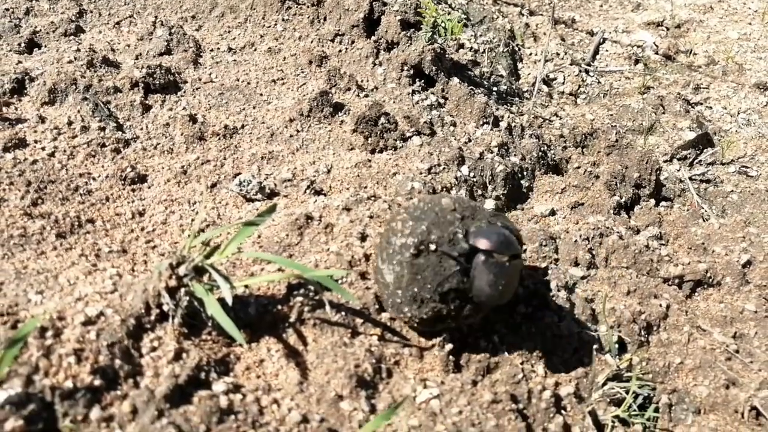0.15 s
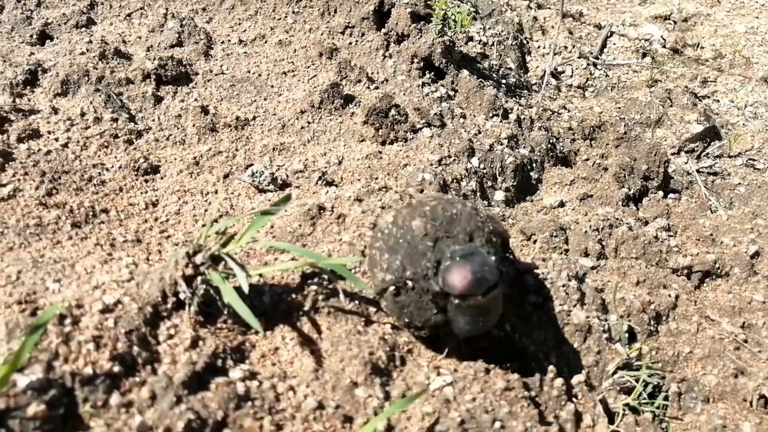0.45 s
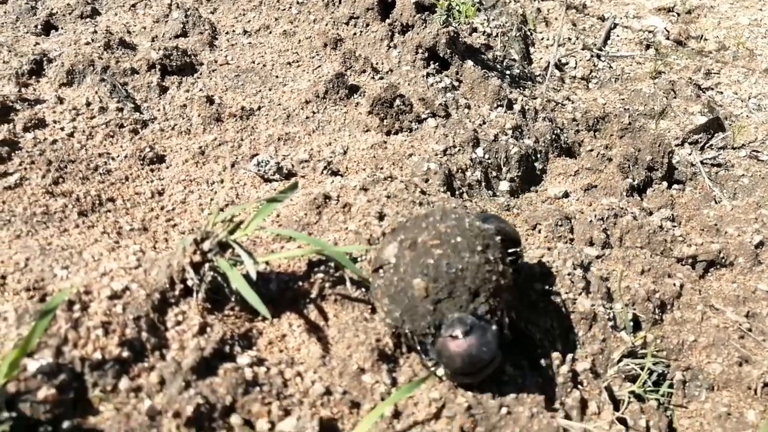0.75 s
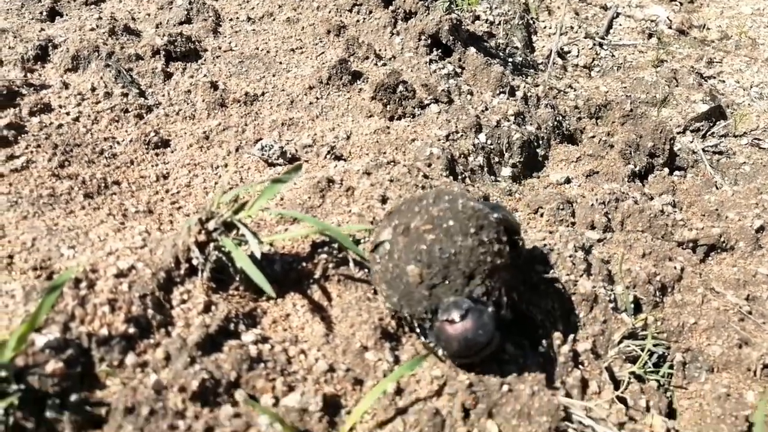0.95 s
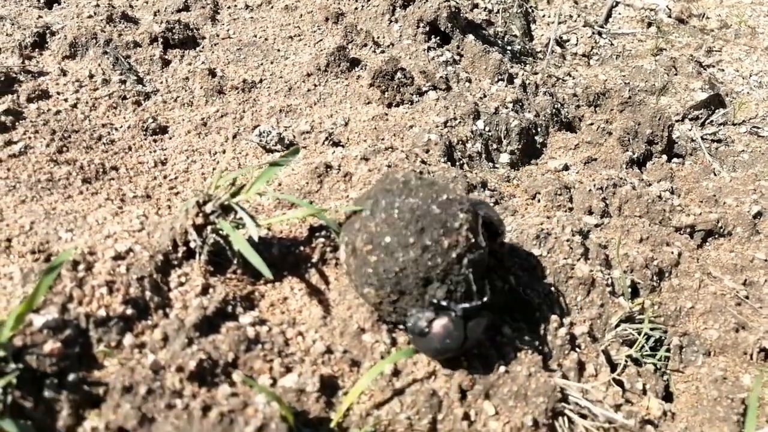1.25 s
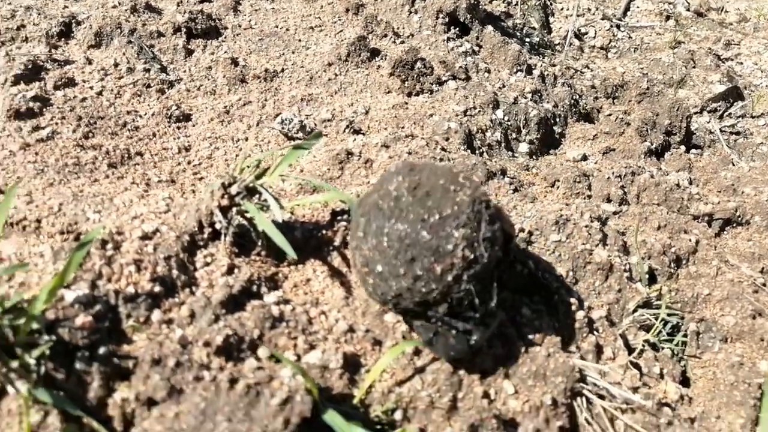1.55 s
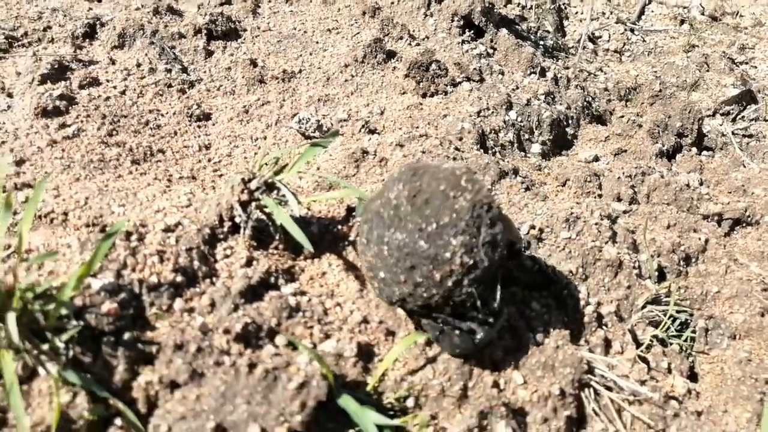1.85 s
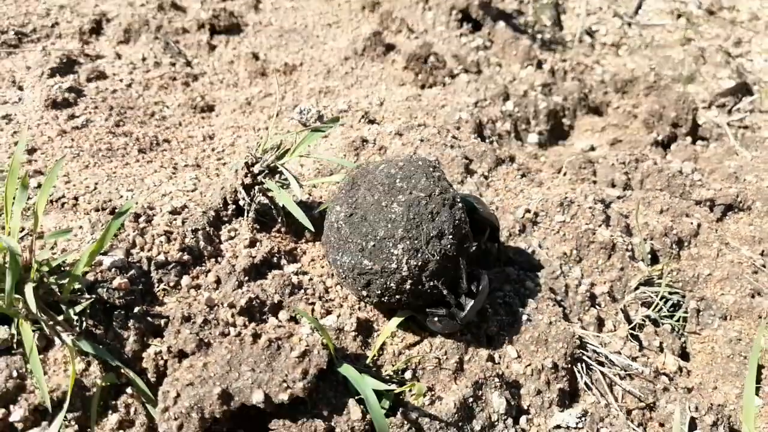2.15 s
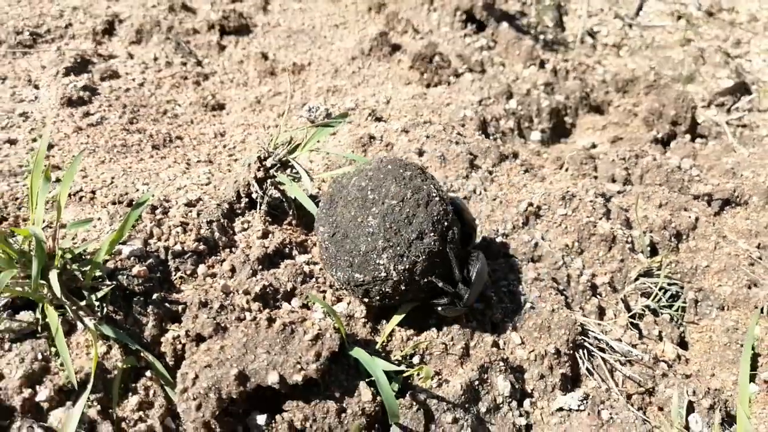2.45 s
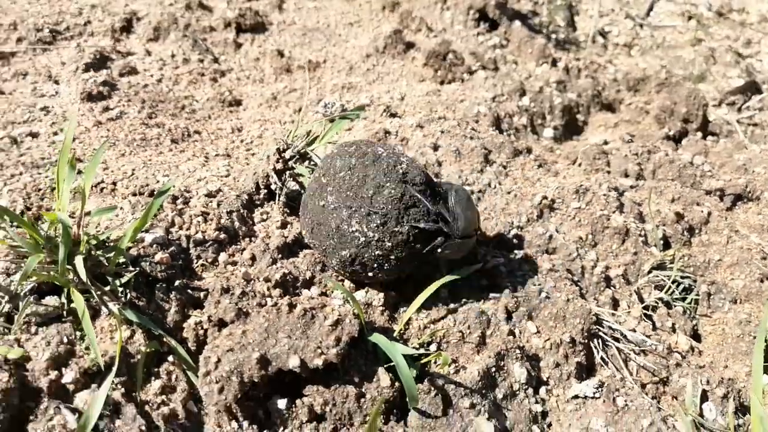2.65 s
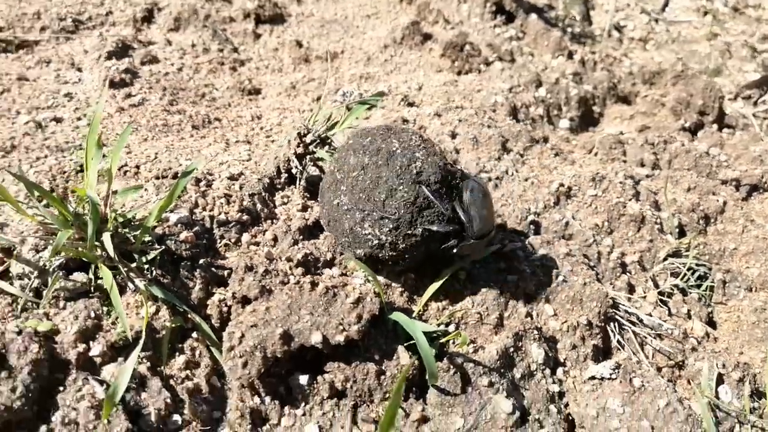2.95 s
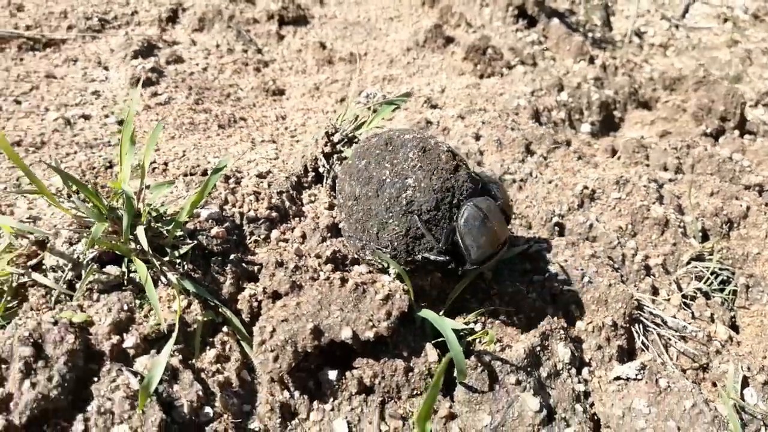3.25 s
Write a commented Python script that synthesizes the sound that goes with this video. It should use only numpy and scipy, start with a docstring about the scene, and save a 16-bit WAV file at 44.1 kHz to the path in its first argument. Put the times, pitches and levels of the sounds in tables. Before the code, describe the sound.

Low, uneven wind rumble on a close microphone outdoors, over faint hiss. Small ticks and rustles of dry soil and faint insect chirps come and go, and halfway through a single short knock hits near the microphone.

```python
"""A light breeze rumbles on the two microphone ports of a phone held low over dry soil.
Each port catches its own turbulence, with flutter, a faint whistle and sharp puffs, over a faint hiss.
To the right an insect rasps its wings in short trains of chirps. Grit and dry stalks rustle in showers
of grains and tick with hollow pings. One soft knock by the right port rings the case."""
import sys
import numpy as np
from scipy import signal
from scipy.fft import rfft, irfft
from scipy.io import wavfile
from scipy.ndimage import uniform_filter1d

SR = 44100
rng = np.random.default_rng(int(sys.argv[2]) if len(sys.argv) > 2 else 0)


def put_to_file(sound):
    """Save the sound as 16-bit audio at rate SR, in the file named by the first command-line argument."""
    columns = np.atleast_2d(sound).T  # one column per channel
    safe = np.clip(columns, -1, 1)
    whole_steps = np.round(safe * 32767)
    wavfile.write(sys.argv[1], SR, whole_steps.astype(np.int16))


N = 149499
T = np.arange(N) / SR
PORT_LAG = 4  # samples by which the grit reaches the right port later
# Midrange resonances of rustles and ticks: f/Hz, width/Hz, level/dB
GRIT_MIDS = [(3630, 1090, -4.5), (5110, 1450, 3)]


def amp(db):
    return 10 ** (np.asarray(db, float) / 20)


def unit(x):
    return x / np.sqrt(np.mean(x ** 2))


def pan(db):
    """Left and right gains; positive dB leans left."""
    return amp(np.array([db, -db]) / 2)


def coloured(spectrum, low_hz, high_hz):
    """Two unrelated noises with the given spectrum, rolled off at both edges."""
    f = np.maximum(np.fft.rfftfreq(N, 1 / SR), 1)
    hz, db = np.array(spectrum, float).T
    edges = np.sqrt((1 + (low_hz / f) ** 8) * (1 + (f / high_hz) ** 8))
    gain = amp(np.interp(np.log(f), np.log(hz), db)) / edges
    return unit(irfft(rfft(rng.standard_normal((2, N))) * gain, N))


def wander(rate_hz):
    """Smooth random drift for each channel, at unit RMS."""
    hold = max(int(SR / rate_hz), 2)
    steps = np.repeat(rng.standard_normal((2, N // hold + 1)), hold, axis=1)
    return unit(uniform_filter1d(uniform_filter1d(steps, hold), hold)[:, :N])


def resonate(x, bands):
    """Parallel band-passes of alternating polarity, scaled so that white noise keeps its level."""
    def bank(drive):
        out = 0
        for k, (hz, width, db) in enumerate(bands):
            sos = signal.butter(2, [hz - width / 2, hz + width / 2], "band", fs=SR, output="sos")
            out += (-1) ** k * amp(db) * signal.sosfilt(sos, drive)
        return out
    return bank(x) / np.linalg.norm(bank(signal.unit_impulse(4096)))


def wind():
    """Turbulence at each port: a rumble, a gustier flutter and a faint whistle above it."""
    # Gust contour: t/s, level/dB, flutter and whistle re rumble/dB, pan/dB
    gusts = [(0.0, -46.5, -1, -6, -9), (0.03, -45.5, -13, -45, -7.0), (0.07, -51, -6, -12, -2),
             (0.15, -45, -18.5, -15.5, -7.5), (0.26, -49.5, -4.5, -13, -1.5), (0.31, -45.5, -10, -6, -7.5),
             (0.37, -44.5, -9, -15, -0.5), (0.55, -46.5, -3, -16.5, -1.5), (0.6, -45, -19.5, -30.5, -9.5),
             (0.73, -47, -4, -13.5, 3.5), (0.88, -49, -3, -22, -3.5), (0.93, -45.5, -18.5, -25.5, -10.5),
             (0.98, -57, -4, -14, 1), (1.02, -48.5, -16.5, -24, -1.5), (1.21, -49.5, -7, -17.5, -2),
             (1.57, -53, -8.5, -19.5, -1.5), (2.1, -47, -9, -27.5, -8), (2.19, -44.5, -8, -10, 5.5),
             (2.22, -37, -12, -23.5, 2.5), (2.29, -51, -1.5, -20, -9.5), (2.33, -44.5, -5.5, -10.5, 1),
             (2.47, -48, -13, -25.5, -5), (2.58, -56, -10, -21.5, -5.5), (2.76, -52, -19, -28, -4.5),
             (3.27, -57, -10.5, -18.5, -6), (3.39, -51.5, -18, -36, -0.5)]
    # Spectrum of the rumble: f/Hz, level/dB
    rumble_curve = [(12, -35.5), (20, -7.5), (53, -1), (92, -1), (152, -8), (220, -15.5), (290, -41.5),
                    (480, -120)]
    # Spectrum that flutter and whistle are cut from: f/Hz, level/dB
    flutter_curve = [(76, -30.5), (130, 0), (205, -7), (263, -12), (371, -16), (521, -26), (700, -33),
                     (910, -62), (1540, -120)]
    t, *columns = np.array(gusts, float).T
    db, flutter_db, whistle_db, side = (np.interp(T, t, column) for column in columns)
    rumble = coloured(rumble_curve, 11, 146) * amp(1.5 * wander(12))
    flutter = amp(flutter_db + 0.08 + 2.5 * wander(25)) * coloured(flutter_curve, 146.6, 291)
    whistle = amp(whistle_db - 3.5 + 2.5 * wander(30)) * coloured(flutter_curve, 317, 640)
    return amp(db + 2.5) * pan(side) * (rumble + flutter + whistle)


def hiss(level_db=-71.5):
    """A faint bed of far air and microphone noise."""
    # Spectrum of the hiss: f/Hz, level/dB
    hiss_curve = [(260, -28), (450, 1), (507, -5.5), (570, -2), (1230, -7.5), (1410, -10.5), (1860, -10),
                  (4150, -16), (5570, -18), (8560, -24.5), (9360, -24.5), (11500, -30.5), (14400, -32),
                  (15500, -30)]
    return amp(level_db + 0.72 * wander(9.9)) * coloured(hiss_curve, 350, 16000)


def insect(length_s=0.014, rise_s=0.00062, trim_db=-8):
    """Each chirp is a short rasp through the wing resonances, off to the right."""
    # Chirp trains: t/s, level/dB
    chirps = [(0.015, -67.5), (0.0857, -65), (0.161, -66.5), (0.3052, -64), (0.376, -68), (0.4474, -71),
              (0.9901, -70.5), (1.063, -72), (1.1358, -68), (1.2072, -69), (1.283, -66.5), (1.356, -65.5),
              (1.43, -65), (1.506, -66.5), (1.5823, -66.5), (1.6561, -68), (1.7285, -69), (1.8043, -66.5),
              (1.8784, -67.5), (1.955, -68), (2.03, -65.5), (2.1041, -68), (2.1789, -68), (3.1163, -68.5),
              (3.1926, -70), (3.27, -68), (3.347, -67.5)]
    # Wing resonances: f/Hz, width/Hz, level/dB
    wing = [(5430, 690, 5), (7280, 1100, 7), (9600, 1400, 2), (11500, 1500, -12)]
    envelope = np.zeros(N)
    for start, db in chirps:
        age = T - start
        envelope += amp(db + trim_db) * np.clip(np.minimum(age / rise_s, 2 * (1 - age / length_s)), 0, 1)
    return pan(-6)[:, None] * resonate(envelope * rng.standard_normal((2, N)), wing)


def grain_shower(per_s=2500, spread_db=1.8):
    """A crackly envelope: grains land at random, each a quickly fading bump."""
    hits = (rng.random(N) < per_s / SR) * amp(spread_db * rng.exponential(size=N))
    return unit(signal.lfilter([1], [1, -.985], hits))


def port_noise(share=.65):
    """White noise, part of which reaches both ports a few samples apart."""
    common = rng.standard_normal(N)
    separate = np.sqrt(1 - share ** 2) * rng.standard_normal((2, N))
    return share * np.array([common, np.roll(common, PORT_LAG)]) + separate


def rustles(crackle, fade_s=0.0095):
    """Grit and dry stalks rustle in dense showers; stray grains fall throughout."""
    # Showers of grains: t/s, length/s, dull/dB, mid/dB, bright/dB
    showers = [(0.21, 0.088, -78.5, -78, -84.5), (0.436, 0.024, -82, -84, -87),
               (.615, 0.039, -73, -75, -77.5), (0.653, .13, -75, -76.5, -89),
               (0.883, 0.135, -88, -93, -107), (1.837, 0.027, -77, -74, -87),
               (2.234, 0.078, -80, -78.5, -85.5), (2.314, 0.046, -76, -73, -80.5),
               (2.364, 0.12, -87, -85, -103), (2.61, 0.073, -76, -84, -94),
               (2.772, 0.12, -77.5, -78.5, -84.5), (2.964, 0.087, -82.5, -81, -88),
               (3.04, 0.032, -75.5, -67, -76.5)]
    # Floor of stray grains: dull/dB, mid/dB, bright/dB
    stray_db = [-91, -91, -92]
    # Dull body of a rustle: f/Hz, width/Hz, level/dB
    dull = [(1230, 1000, 1.5), (1700, 1660, 11), (2580, 810, -1)]
    # Bright scuff on top: f/Hz, width/Hz, level/dB
    scuff = [(7340, 1440, -4), (9500, 1740, 0), (12900, 3000, -18)]
    envelopes = np.outer(amp(stray_db), np.ones(N))
    for start, length, *band_db in showers:
        gate = np.clip(np.minimum(T - start, start + length - T) / fade_s, 0, 1)
        envelopes += np.outer(amp(band_db), gate)
    return sum(resonate(env * crackle, bands) for env, bands in zip(envelopes, [dull, GRIT_MIDS, scuff]))


def ticks(noise, rise_s=.0008, ping_t60_s=0.0085, crack_t60_s=.006):
    """Each tick of grit is a hollow ping with a tiny crack of noise."""
    # Grit impacts: t/s, level/dB, ping f/Hz, mid offset/dB, bright offset/dB, pan/dB
    impacts = [(0.2349, -45.5, 1650, -23, -2.5, -5.0), (0.2566, -55, 1650, -5, -8, 2),
               (0.264, -42.5, 1690, -13, -3.5, 1.0), (0.339, -71, 1580, -7, 0, 2.0),
               (0.4472, -54.5, 1490, -12, -19, 4), (0.467, -56, 2200, -9, -17, 5),
               (0.575, -62, 1380, -1, -9, -2.0), (0.6235, -63, 1530, -10, -9, -0.5),
               (0.7153, -52, 1710, -17, -24, 4), (0.7447, -56, 1900, -12, -17, 1.0),
               (0.7742, -64.5, 1180, 10, 2, -3), (1.0997, -56.5, 1220, -3.5, -3, -2),
               (1.226, -64, 1210, -13, -17, -8), (1.6252, -58, 1560, -7, -1.5, 0.0),
               (1.694, -57, 1320, -8, -9, -11), (1.7764, -56.5, 2100, -4.5, -14, -0.5),
               (1.831, -65, 1240, -1, -6, 0.0), (1.8537, -56, 2310, -15, -12, -11),
               (1.9818, -59, 1610, -14, -19, 0.0), (2.168, -58, 1380, -7, -7, 0.0),
               (2.2488, -51, 1310, -12, -14, -2), (2.3196, -54.5, 1920, -8, -7, -3),
               (2.356, -57.5, 1730, -4.5, -18, -16), (2.3789, -55, 1150, -14, -20, -9),
               (2.5088, -53.5, 1160, -19, -19, -0.5), (2.6255, -51.5, 1490, -24, -28, -1),
               (2.7987, -63, 1270, -5, -15, -6), (2.8451, -51, 1200, -11, -13, -4),
               (2.8622, -51, 1180, -10, -15, -1), (2.8878, -58.5, 1740, -17, -19, 0.5),
               (2.97, -56.5, 1320, -16, -8.5, -3.5), (2.9894, -68, 1810, -6, -9, 0.0),
               (3.0554, -60, 1190, 1, -2, -8), (3.161, -62, 1930, 0, 2.5, -1),
               (3.2048, -55.5, 1170, -17, -14.5, -9)]
    # Layer balance of a tick: ping/dB, mid/dB, bright/dB, crunch/dB
    layer_db = [0.5, 7, 4, -2.5]
    # Bright edge of the crack: f/Hz, width/Hz, level/dB
    bright = [(7350, 1740, 4.5), (9440, 1600, -3), (13440, 3500, -9.5)]
    # Crunch around the ping: f/Hz, width/Hz, level/dB
    crunch = [(805, 820, 1.5), (2570, 1440, -3)]
    envelopes, pings, age = np.zeros((3, 2, N)), np.zeros((2, N)), T[:2048]
    for start, db, hz, mid_db, bright_db, side in impacts:
        span = slice(int(start * SR), int(start * SR) + len(age))
        attack = pan(side)[:, None] * amp(db) * np.minimum(age / rise_s, 1)
        pings[:, span] += attack * amp(layer_db[0] - 60 * age / ping_t60_s) * np.sin(2 * np.pi * hz * age)
        band_gains = amp(np.add(layer_db[1:], [mid_db, bright_db, 0]))[:, None, None]
        envelopes[:, :, span] += band_gains * attack * amp(-60 * age / crack_t60_s)
    pings[1] = np.roll(pings[1], PORT_LAG)
    layers = zip(envelopes, [GRIT_MIDS, bright, crunch])
    return pings + sum(resonate(env * noise, bands) for env, bands in layers)


def puffs():
    """Sharp puffs of wind whistle on the ports, each a tone in a bell-shaped swell."""
    # Whistling puffs: centre t/s, level/dB, f/Hz, Gaussian width/s, pan/dB
    blips = [(.3115, -37, 390, .0034, 14), (.311, -57, 620, .003, 12), (1.33, -57, 400, .005, 0),
             (2.18, -53, 450, .007, 8), (2.345, -49, 375, .007, 4), (2.99, -69, 560, .011, 0),
             (3.075, -60, 310, .004, 0)]
    out = np.zeros((2, N))
    for centre, db, hz, width, side in blips:
        swell = amp(db) * np.exp(-.5 * ((T - centre) / width) ** 2)
        out += pan(side)[:, None] * swell * np.cos(2 * np.pi * hz * (T - centre))
    return out


def knock(start_s=1.6841, contact_s=0.00037, peak_db=-13, low_cut_hz=662):
    """A soft tap beside the right port rings the case, with no bass, and faintly its thin shell."""
    # Modes of the case: f/Hz, level/dB, t60/s
    case_modes = [(698, -8, 0.023), (897, 3, .013), (1020, -4.5, 0.018), (1225, -3, 0.011),
                  (1620, 6, 0.0036), (2585, 3.5, 0.0037), (3150, -1, 0.0024)]
    # High modes of the shell: f/Hz, level/dB, t60/s
    shell_modes = [(5500, -43.5, 0.0063), (6900, -50, 0.0044), (9300, -44, 0.0046), (11300, -52, .005)]
    age = np.maximum(T - start_s, 0)

    def ring(modes):
        return sum(amp(db - 60 * age / t60) * np.sin(2 * np.pi * hz * age) for hz, db, t60 in modes)

    push = np.sin(np.pi * np.clip(T[:64] / contact_s, 0, 1)) ** 2
    body = signal.lfilter(push, [1], ring(case_modes))
    body = signal.sosfiltfilt(signal.cheby1(8, .5, low_cut_hz, "high", fs=SR, output="sos"), body)
    body *= amp(peak_db) / np.abs(body).max()
    shell = ring(shell_modes) * np.minimum(age / 0.00032, 1)
    return amp([[-45], [0]]) * body + amp([[-25], [0]]) * shell  # little reaches the left port


def scene():
    """Wind, hiss and insect, with the dry soil sounds, puffs and knock on top."""
    bed = wind() + hiss() + insect()
    grains, noise = grain_shower(), port_noise()
    return bed + rustles(grains * noise) + ticks(noise) + puffs() + knock()


def record(dry, top_hz=15300):
    """The phone cuts the top octave's upper end steeply."""
    return signal.sosfilt(signal.ellip(10, .2, 70, top_hz, fs=SR, output="sos"), dry)


dry = scene()
out = record(dry)
put_to_file(out)
```